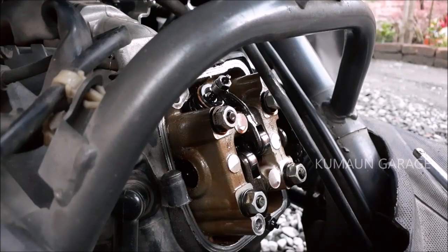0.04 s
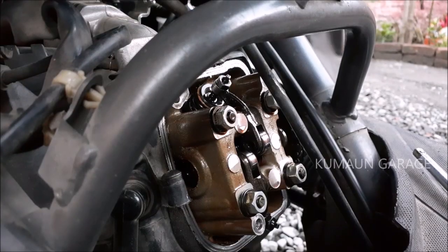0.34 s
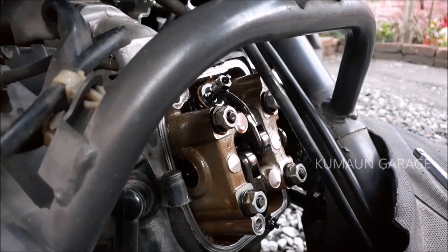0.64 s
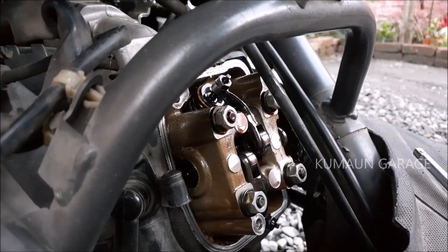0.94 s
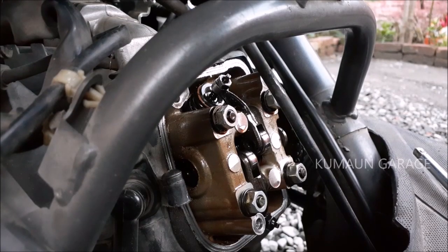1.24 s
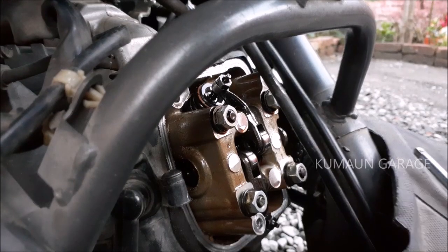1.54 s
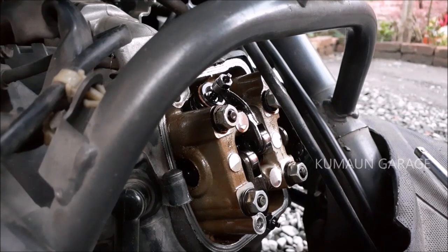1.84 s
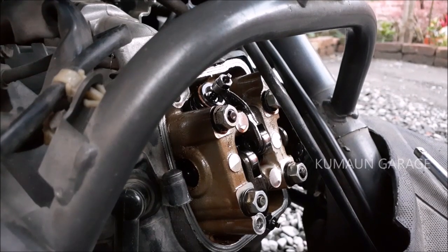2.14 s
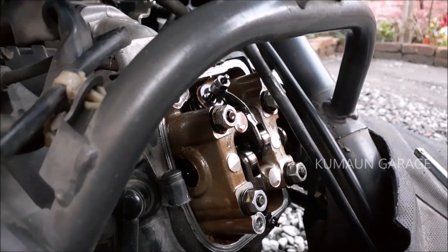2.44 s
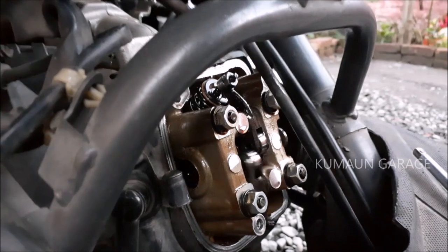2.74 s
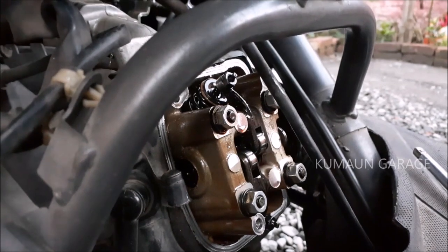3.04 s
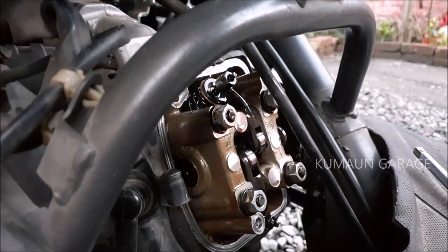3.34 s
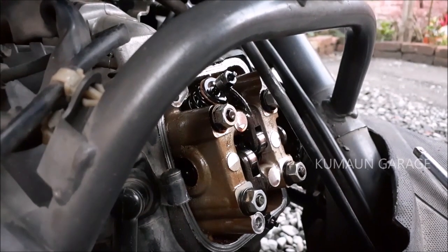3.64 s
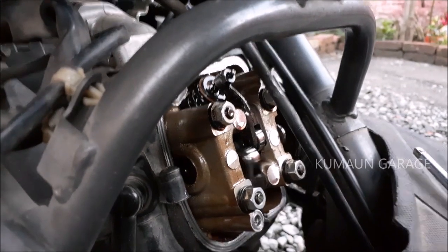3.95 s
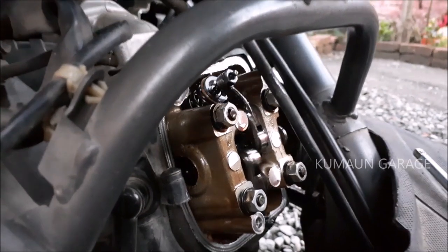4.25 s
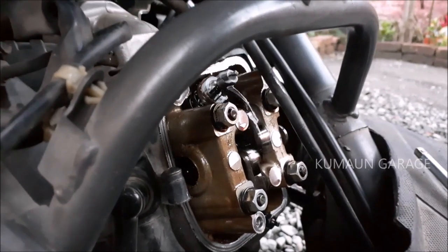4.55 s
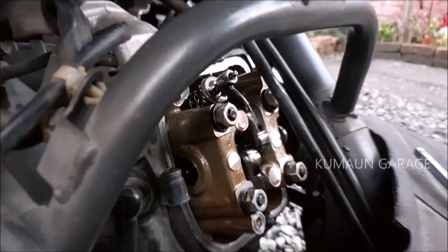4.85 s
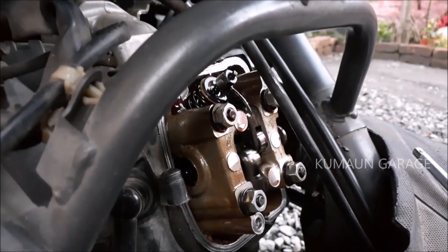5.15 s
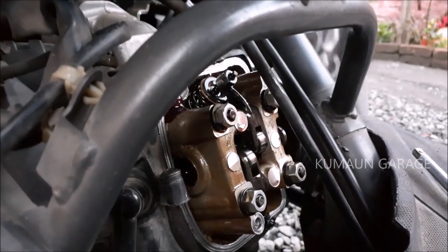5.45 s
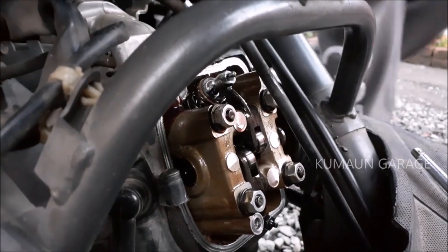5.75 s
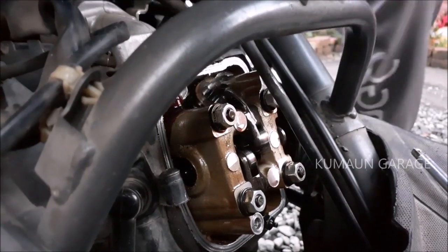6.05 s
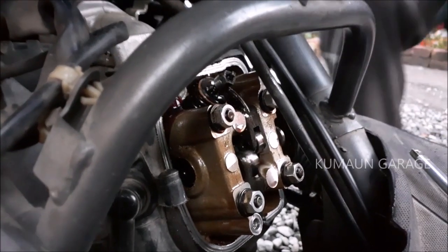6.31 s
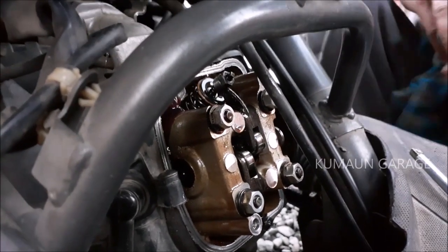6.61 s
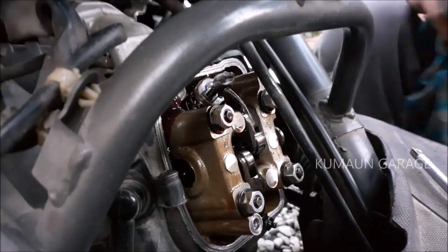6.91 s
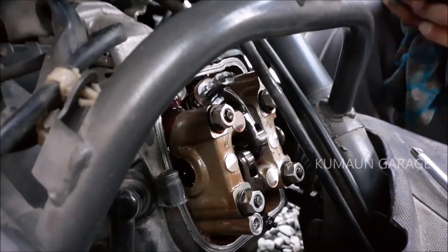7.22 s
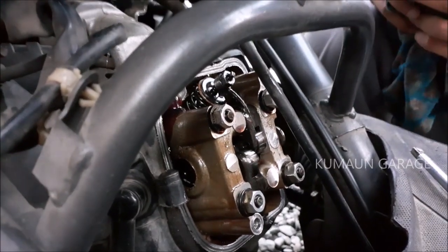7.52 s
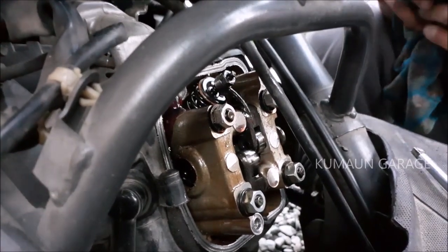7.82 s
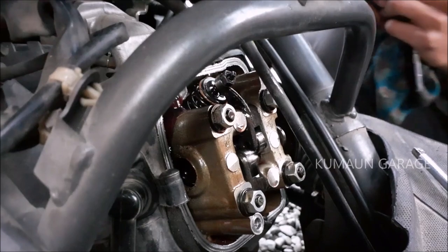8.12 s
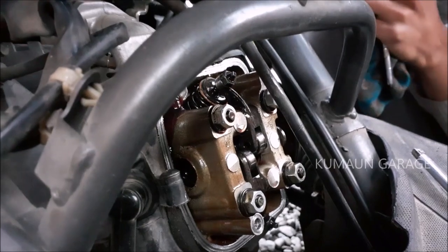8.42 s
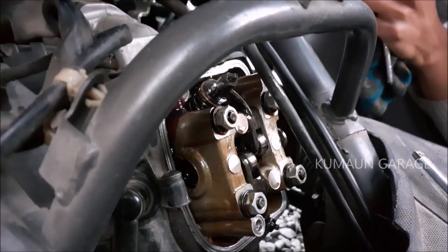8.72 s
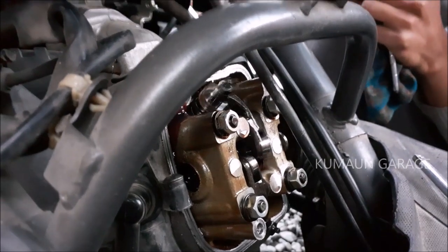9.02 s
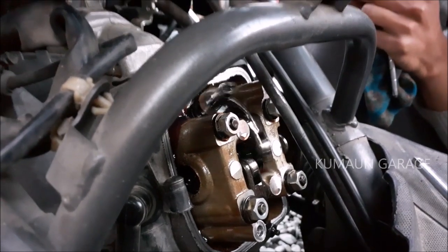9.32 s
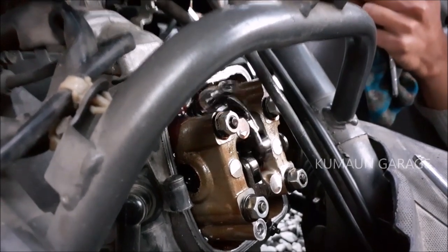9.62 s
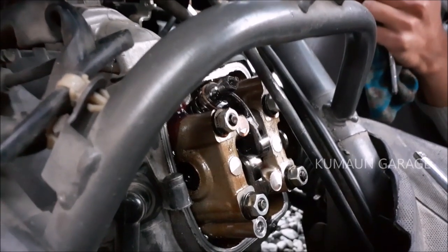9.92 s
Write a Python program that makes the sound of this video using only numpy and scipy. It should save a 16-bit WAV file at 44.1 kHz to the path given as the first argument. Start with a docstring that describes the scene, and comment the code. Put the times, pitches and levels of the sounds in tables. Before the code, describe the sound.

Plastic panels rub and tap faintly, then a scooter's steel kick lever clunks and gives a tiny high squeak. One kick spins the small engine with a rattle and sharp clanks, but it winds down. On the second kick it catches and settles into a steady idle, with rapid valve tapping, a rasping chain and a puttering exhaust. The microphone is close to the open engine, in a quiet spot outdoors.

```python
"""A small single-cylinder scooter engine, valve cover off, is kick-started close by, outdoors.
The steel lever knocks and squeaks; one kick spins the engine in vain, on the second it catches.
At idle the cam chain rasps on its sprocket, the rockers tap at fixed points of each cycle and
gas pulses make the exhaust putter. Before the kicks, plastic panels rub and a far bird chirps once."""
import sys
import numpy as np
from scipy import signal
from scipy.fft import rfft, irfft, next_fast_len
from scipy.io import wavfile
from scipy.ndimage import uniform_filter1d, map_coordinates

SR = 44100
rng = np.random.default_rng(int(sys.argv[2]) if len(sys.argv) > 2 else 0)


def materialize(psi):
    """Save the field psi as 16-bit PCM at rate SR to the path in sys.argv[1].

    A 1-D psi becomes a single channel; in a 2-D psi each row is a channel.
    """
    bounded = np.clip(np.atleast_2d(psi).T, -1, 1)
    quanta = np.round(bounded * 32767).astype(np.int16)
    wavfile.write(sys.argv[1], SR, quanta)


N = 439677

# engine speed once caught: (time [s], four-stroke cycle rate [Hz])
RUN_SPEED = [(4.1, 10.43), (4.39, 10.82), (5.02, 9.242), (5.88, 9.626), (6.15, 8.989), (6.4, 10.106),
             (6.73, 8.867), (6.84, 9.674), (6.97, 9.055), (8.14, 9.729), (8.4, 9.406), (8.7, 9.859),
             (8.87, 9.308), (9.48, 10.084), (9.8, 9.28), (9.97, 10.334)]
# cylinder head resonances: (frequency [Hz], width [Hz], level [dB])
HEAD_MODES = [(675, 74, 2), (773, 50, 0), (893, 55, 3), (1097, 60, 2.5), (1460, 38, 2), (1620, 43, -4),
              (1720, 39, -1), (1832, 59, 4), (2225, 59, 2)]
# hiss of the chain and of steel ticks: (frequency [Hz], density [dB])
STEEL_SPECTRUM = [(1500, -39.5), (3500, -6.5), (4800, -5.5), (5700, -8), (7200, -5.5), (7600, -11),
                  (8200, -2.5), (9000, -5), (10000, -2.5), (13500, -1.5), (14500, -3), (15000, -12.5),
                  (16000, 2)]
# hollow plastic panels: (frequency [Hz], density [dB])
PANEL_SPECTRUM = [(300, -12), (800, -15), (1100, -5), (1500, -3), (1900, -14), (2400, -16), (4000, -16.5),
                  (7000, -18.5), (10000, -20.5), (16000, -30)]
# stereo balance: (frequency [Hz], L-R [dB])
STEREO_BALANCE = [(150, -2), (250, -2), (350, -5.5), (480, 4), (700, 3), (1500, -0.5), (2800, -.5),
                  (6000, -0.5), (10000, -2), (15000, -1.5)]


def amp(db):
    """Decibels to gain."""
    return np.exp(np.asarray(db) * (np.log(10) / 20))


def clock():
    """Sample times [s]."""
    return np.arange(N) / SR


def along(points, hz):
    """Interpolate (frequency [Hz], value) points on a log axis."""
    f, v = np.transpose(points)
    return np.interp(np.log(hz + 1), np.log(f + 1), v)


def curves(rows):
    """One value per sample for each column after the time."""
    s, *cols = np.transpose(rows)
    return [np.interp(clock(), s, c) for c in cols]


def wobble(rate_hz):
    """Smooth random curve, rate_hz knots a second."""
    steps = np.arange(0, N * rate_hz / SR + 1, 1 / 8)
    knots = rng.standard_normal(int(steps[-1]) + 2)
    return np.interp(clock() * rate_hz, steps, map_coordinates(knots, [steps]))


def filtered(x, response):
    """Apply a gain given as a function of frequency."""
    size = next_fast_len(N + 8192)
    return irfft(rfft(x, size) * response(np.fft.rfftfreq(size, 1 / SR)), size)[..., :N]


def noise(spectrum):
    """Coloured stereo noise, tinged by the nearby head's resonances; mid rms 1."""
    # likeness of left and right: (frequency [Hz], correlation [1])
    likeness = [(30, .35), (70, .8), (150, 0.75), (330, 0.49), (700, 0.36), (1400, 0.1), (5000, 0.04),
                (14000, 0.0043)]
    size = next_fast_len(N, True)
    hz = np.fft.rfftfreq(size, 1 / SR)
    spread = np.arccos(np.clip(along(likeness, hz), -1, 1)) / 2
    peaks_db = sum(db / (1 + (2 * (hz - centre) / width) ** 2) for centre, width, db in HEAD_MODES)
    white = rng.standard_normal((2, 2 * len(hz))).view(complex)
    mid, side = white * amp(along(spectrum, hz) + peaks_db) * np.array([np.cos(spread), np.sin(spread)])
    lean = amp(along(STEREO_BALANCE, hz) / 2)
    pair = irfft(np.array([(mid + side) * lean, (mid - side) / lean]), size)[:, :N]
    return pair / np.std(pair.mean(axis=0))


def outdoor_air():
    """Faint, low outdoor noise."""
    # background loudness: (time [s], level [dB])
    levels = [(0, -57), (.2, -68.5), (1.5, -67.5), (3.8, -71), (9.97, -77.5)]
    # background colour: (frequency [Hz], density [dB])
    spectrum = [(25, -10), (65, -0.5), (140, -2.5), (250, -5), (420, -5.5), (600, -12.5), (1000, -17.5),
                (1550, -15.5), (2100, -19.5), (4000, -27), (8000, -35.5), (16000, -26.5)]
    return amp(curves(levels)[0]) * noise(spectrum)


def bird(waver_hz):
    """A far bird: one falling, unsteady tone."""
    # chirp: (time [s], pitch [Hz], level [dB])
    chirp = [(.46, 3200, -88), (.51, 3070, -75), (.56, 3030, -88)]
    hz, db = curves(chirp)
    sounding = (clock() > chirp[0][0]) & (clock() < chirp[-1][0])
    phase = 2 * np.pi * np.cumsum(hz + waver_hz * wobble(600)) / SR
    return sounding * amp(db) * np.sqrt(2) * np.sin(phase)


def yard(x, t60_s):
    """Short, slightly dull reverberation from ground and walls."""
    t = np.arange(SR // 4) / SR
    tail = rng.standard_normal((2, len(t))) * amp(-60 * t / t60_s) * (t > .008)
    wet = signal.oaconvolve(x, tail / np.linalg.norm(tail[0]), axes=1)[:, :N]
    return filtered(wet, lambda hz: amp(along([(300, 1.9), (3000, 0.26), (14000, -0.7)], hz)))


def bodywork(x, echo_db, count=10):
    """x plus the treble that nearby tubes and panels throw back within 25 ms."""
    echoes = np.zeros((2, SR // 40))
    for side in echoes:
        side[rng.integers(SR // 1000, len(side), count)] = rng.choice([-1, 1], count) / np.sqrt(count)
    near = signal.oaconvolve(x, echoes, axes=1)[:, :N]
    share = lambda hz: amp(echo_db + along([(400, -39), (2000, -4)], hz))
    return filtered(x + filtered(near, share), lambda hz: 1 / np.sqrt(1 + share(hz) ** 2))


def handling():
    """The scooter shifts on its stand: panels rub, then shiver on; the frame rumbles."""
    # rubs: (time [s], panel [dB], frame [dB])
    rubs = [(0.01, -69, -69), (.585, -57, -67), (.68, -68, -72), (.745, -81, -64), (.87, -64, -86),
            (.95, -72, -62), (1.114, -57, -69), (1.147, -55, -61.5), (1.33, -77, -62)]
    # frame rumble: (frequency [Hz], density [dB])
    frame_spectrum = [(25, -22), (80, -2), (150, -7), (300, 1), (700, -34.5)]
    rise_s, rub_t60_s, shiver_db, shiver_t60_s = 0.015, 0.23, -8, 0.95
    power = np.zeros((2, N))
    for s, *levels_db in rubs:
        t = clock()[:3 * SR] - s
        after = np.maximum(t, 0)
        decay = amp(-60 * after / rub_t60_s) + amp(shiver_db - 60 * after / shiver_t60_s)
        shape = np.exp(np.minimum(t, 0) / rise_s) * decay / (1 + amp(shiver_db))
        power[:, :len(t)] += np.outer(amp(levels_db), shape) ** 2
    panel, frame = np.sqrt(power)
    return panel * amp(2.8 * wobble(160)) * noise(PANEL_SPECTRUM) + frame * noise(frame_spectrum)


def panel_taps():
    """A panel snaps against its seat with a short, hollow tap."""
    # taps: (time [s], level [dB], t60 [s])
    taps = [(.576, -45, .035), (1.13, -44, .04)]
    envelope = np.zeros(N)
    t = np.arange(SR // 8) / SR
    for s, db, t60_s in taps:
        envelope[round(s * SR):][:len(t)] += amp(db - 60 * t / t60_s) * (1 - np.exp(-t / .0005))
    return envelope * noise(PANEL_SPECTRUM)


def pivot_squeaks(waver_hz):
    """Each slip of the lever's pivot swells and fades on one high, unsteady mode."""
    # slips: (time [s], length [s], pitch [Hz], level [dB])
    slips = [(2.213, 0.017, 14360, -24), (2.22, .045, 12800, -41), (2.25, .022, 13100, -32)]
    out = np.zeros(N)
    waver = waver_hz * wobble(600)
    for s, length_s, hz, db in slips:
        span = slice(round(s * SR), round((s + length_s) * SR))
        phase = 2 * np.pi * np.cumsum(hz + waver[span]) / SR
        out[span] += amp(db) * np.sqrt(2) * np.hanning(len(phase)) * np.sin(phase)
    return out


def blow_list():
    """Yield each clang and knock in the form clangs_and_knocks unpacks; harder is brighter."""
    # kick lever meets gear or stop: (time [s], clang [dB], hardness [dB], ring re clang [dB],
    # rise [s], t60 [s], thud [dB], thud pitch [Hz])
    clangs = [(1.61, -24.5, -3.5, -4, 0.0023, 0.12, -25.5, 248),
              (1.972, -35, -0.5, 6.5, 0.0011, 0.07, -48, 440),
              (2.281, -32, -4, 11, 0.0016, 0.085, -40.5, 312),
              (2.617, -33, 11.5, -8, 0.0016, 0.12, -31.5, 435), (2.707, -25.5, 7, -4, .0012, .06, -42, 350),
              (2.735, -27, 8, -2, .0012, 0.051, -46, 350), (2.768, -13, 8.5, -15, 0.0028, 0.07, -26.5, 413),
              (3.031, -44, 7.5, -6, .0012, 0.15, -42.5, 164), (3.39, -33, -3, -14, 0.0015, 0.15, -47, 191),
              (3.429, -21, 1, -7, 0.0014, 0.055, -41.5, 403),
              (4.149, -22, 12.5, -11, 0.0024, 0.14, -37, 300), (4.186, -16, 6, -4, 0.0018, 0.084, -43, 510),
              (4.1934, -14.5, -1, -5, 0.00035, 0.021, -44, 500), (4.213, -33, 2, 5, .001, 0.089, -44, 403)]
    # dull knocks in panels, crankcase and frame:
    # (time [s], clonk [dB], hardness [dB], thud [dB], thud pitch [Hz], L-R [dB])
    knocks = [(0.915, -56.5, -11, -48.5, 280, -1), (1.128, -50, -18, -49, 203, -3),
              (1.725, -47, -15, -46, 520, 2), (1.82, -64, -20, -47, 260, -2),
              (2.173, -71, -40, -42.5, 308, -5), (2.794, -27, -25, -34, 420, 3),
              (2.82, -27.5, -5, -45, 300, 0), (2.847, -35, -18, -30, 62, 0),
              (2.893, -30, -9, -30.5, 290, -4), (2.908, -41, -1, -39, 403, 1),
              (2.967, -34, -12, -54, 268, 0), (3.179, -37, -10, -27.5, 141, -5),
              (3.192, -24, -2, -31, 118, -1), (3.243, -39, -6, -49, 300, 0), (3.265, -38, -10, -45, 400, 0),
              (3.334, -32.5, -26, -40, 186, 2), (3.362, -46, -10, -40, 250, 0),
              (3.547, -42, -12, -45, 190, -2), (3.573, -40.5, -8, -42, 244, -1),
              (3.623, -55, -30, -46, 280, 0), (3.643, -51, -16, -52, 320, 2),
              (3.669, -49, -30, -55, 183, 0), (3.858, -48, -17.5, -49, 222, -1),
              (3.93, -46, -28, -47, 237, 1), (4.062, -33, -13, -26, 437, 0), (4.084, -38, -12, -33, 260, 2),
              (4.267, -31, -12, -39, 420, 0), (4.281, -36, -14, -31, 160, 0),
              (4.44, -22, -25, -27, 345, -1), (4.946, -23.5, -5, -30, 186, 3), (6.868, -26, 0, -39, 300, 0),
              (8.545, -26, -8, -43, 300, -2), (9.067, -25, -10, -43, 300, 4)]
    for s, clang_db, hard_db, ring_db, rise_s, t60_s, thud_db, hz in clangs:
        clonk_db, tick_db = clang_db - 9.5, clang_db + hard_db
        yield s, (thud_db, clonk_db, clang_db, tick_db, ring_db), hz, t60_s, rise_s, 0
    ring_db, t60_s, rise_s = 0, 0.05, .0012
    for s, clonk_db, hard_db, thud_db, hz, pan_db in knocks:
        clang_db, tick_db = clonk_db - 4.5 + hard_db / 2, clonk_db + hard_db
        yield s, (thud_db, clonk_db, clang_db, tick_db, ring_db), hz, t60_s, rise_s, pan_db


def clangs_and_knocks(tail_db, tail_t60_s, thud_stretch, boom_db):
    """Kick lever clangs and dull knocks: each a thud, clonk, clang and tick; loose parts shiver on."""
    # kick lever ring: (frequency [Hz], level [dB], t60 [s])
    lever_modes = [(1200, -15, .08), (1650, -14, .07), (2560, -12, .06), (2756, -3.5, .052),
                   (3311, -12, .06), (3590, -10, .06), (3890, -9, .06)]
    # frame tube ring, after heavy and hard blows: (frequency [Hz], level [dB], t60 [s])
    tube_modes = [(304, -13.5, .22), (665, -11.5, 0.28), (1240, -17.5, 0.32), (2190, -12, 0.22),
                  (2440, -11.5, 0.16), (2859, -20, .17)]
    # frame thud, case clonk, steel clang: (frequency [Hz], density [dB])
    thud_spectrum = [(25, -18.5), (60, -17), (110, 2), (180, -4), (270, 3.5), (440, -0.5), (580, -7),
                     (1500, -39.5)]
    clonk_spectrum = [(300, -17), (600, 0.5), (800, 2.5), (1100, -1.5), (1450, 2.5), (1800, -3.5),
                      (2200, -9), (5000, -43)]
    clang_spectrum = [(900, -15), (2000, 2.5), (2800, 5), (4000, 2), (5000, -0.5), (6500, -6.5),
                      (12000, -32)]
    envelopes, ring = np.zeros((4, 2, N)), np.zeros(N)
    for s, levels_db, thud_hz, t60_s, rise_s, pan_db in blow_list():
        thud_db, clonk_db, clang_db, tick_db, ring_db = levels_db
        span = slice(round(s * SR), round(s * SR) + SR // 2)
        t = np.arange(len(ring[span])) / SR
        attack = 1 - np.exp(-t / rise_s)
        sides = amp(np.array([[.5], [-.5]]) * pan_db)
        shiver = amp(tail_db - 60 * t / tail_t60_s)
        bands = [(thud_db - 2, thud_stretch), (clonk_db, 1.43), (clang_db, 1), (tick_db, 0.64)]
        for band, (db, stretch) in enumerate(bands):  # low bands last longer
            decay = amp(-60 * t / (t60_s * stretch))
            envelopes[band, :, span] += sides * attack * amp(db) * (decay + shiver)
        ring[span] += attack * amp(thud_db + boom_db - 60 * t / t60_s) * np.sin(2 * np.pi * thud_hz * t)
        for modes, drive_db in ((lever_modes, clang_db + ring_db), (tube_modes, min(thud_db, clang_db))):
            for hz, db, life_s in modes:
                mode_db = drive_db + db + 1.1 * rng.standard_normal()
                ring[span] += attack * amp(mode_db - 60 * t / life_s) * np.sin(2 * np.pi * hz * t)
    chatter = amp(1.3 * wobble(350))
    spectra = (thud_spectrum, clonk_spectrum, clang_spectrum, STEEL_SPECTRUM)
    return ring + chatter * sum(env * noise(spectrum) for env, spectrum in zip(envelopes, spectra))


def cycle_hz():
    """Engine speed: a crawl, a kick that spins up and coasts down, then the catch."""
    kick_s, push_s, spin_up_s, coast_tau_s = 2.5, .29, .15, .3
    crawl_hz, kick_hz = 0.97, 7.3
    t = clock()
    coast = np.exp(-np.maximum(t - kick_s - push_s, 0) / coast_tau_s)
    kick = np.clip((t - kick_s) / spin_up_s, 0, 1) * coast
    cranking_hz = crawl_hz + (kick_hz - crawl_hz) * kick
    caught = np.clip(1 + (t - RUN_SPEED[0][0]) / spin_up_s, 0, 1)
    return cranking_hz + caught * (curves(RUN_SPEED)[0] - cranking_hz)


def cam_angle(firing_s):
    """Cycles turned since the firing at firing_s."""
    turns = np.cumsum(cycle_hz()) / SR
    return turns - turns[round(firing_s * SR)]


def strikes(angle, scatter_db, jitter_s):
    """An impulse of random size each time the angle passes a whole number."""
    at = np.flatnonzero(np.diff(np.floor(angle)) > 0)
    size, late = rng.standard_normal((len(at), 2)).T
    at = np.clip(at + np.round(late * jitter_s * SR).astype(int), 0, N - 1)
    return np.bincount(at, amp(scatter_db * size), N)


def dying(impulses, t60_s):
    """Envelope of overlapping blows whose energies add and decay."""
    return np.sqrt(signal.lfilter([1], [1, -10 ** (-6 / (t60_s * SR))], impulses ** 2))


def ringing(blows, modes, rise_s, focus_hz=None, focus_db_per_oct=17, scatter_db=2.2):
    """Each blow rings the modes in a new mix, less far from focus_hz; each side has its own phases."""
    t = np.arange(SR // 12) / SR
    hz, width_hz, db = np.transpose(modes)
    if focus_hz:
        db = db - focus_db_per_oct * np.abs(np.log2(hz / focus_hz))
    phase = np.outer(hz, t) + rng.random((2, len(hz), 1))
    waves = np.exp(-np.pi * np.outer(width_hz, t)) * np.sin(2 * np.pi * phase) * (1 - np.exp(-t / rise_s))
    out = np.zeros((2, N + len(t)))
    for at in np.flatnonzero(blows):
        out[:, at:at + len(t)] += blows[at] * amp(db + scatter_db * rng.standard_normal(len(hz))) @ waves
    return out[:, :N]


def low_thumps():
    """Low thumps: under the first clunk, during the failed kick and its rebound, at the first firing."""
    # thumps: (time [s], level [dB], pitch [Hz], t60 [s])
    thumps = [(1.62, -32, 84, 0.22), (2.68, -23, 79.5, .08), (3.182, -20, 115, 0.16),
              (4.074, -21, 230, 0.067)]
    out = np.zeros(N)
    t = np.arange(SR // 4) / SR
    attack = 1 - np.exp(-t / 0.0048)
    for s, db, hz, t60_s in thumps:
        out[round(s * SR):][:len(t)] += attack * amp(db - 60 * t / t60_s) * np.sin(2 * np.pi * hz * t)
    return out


def exhaust(angle, t60_s):
    """Each gas pulse briefly swings the air in silencer or airbox and rings the crankcase."""
    # exhaust and intake pulses: (phase [cycles], level [dB], pitch [Hz], crankcase [dB])
    puffs = [(0.97, -14.5, 120.7, -33.5), (0.0896, -17, 115, -27), (.215, -23, 70, -30.5),
             (.335, -21.5, 105, -40), (.45, -28.5, 130, -34)]
    # hollow crankcase: (frequency [Hz], width [Hz], level [dB])
    case_modes = [(232, 40, -6.5), (296, 26, -2.5), (352.2, 19, 0), (400, 52, -9)]
    # combustion strength: (time [s], level [dB])
    combustion = [(4.0, -85), (4.07, -14), (4.6, -1.5), (5.5, -3.5), (6.1, -1), (9.97, 0)]
    t = np.arange(SR // 8) / SR
    attack = 1 - np.exp(-t / 0.0017)
    case, out = np.zeros((2, len(t))), np.zeros((2, N))
    for hz, width_hz, db in case_modes:
        sides = amp(db + np.array([[.5], [-.5]]) * along(STEREO_BALANCE, hz))
        case += sides * np.exp(-np.pi * width_hz * t) * np.sin(2 * np.pi * hz * t)
    for phase, db, hz, case_db in puffs:
        swing = np.sin(2 * np.pi * hz * t) * amp(db - 60 * t / t60_s)
        pulses = strikes(angle - phase, scatter_db=.8, jitter_s=.00018)
        out += signal.oaconvolve(pulses[None], attack * (swing + amp(case_db) * case), axes=1)[:, :N]
    return out * amp(curves(combustion)[0])


def rockers(angle):
    """Each contact clicks once a cycle and rings its part of the head, harder as the engine settles."""
    # rocker and valve contacts, piston slap:
    # (phase [cycles], knock [dB], knock focus [Hz], clack [dB], tick [dB])
    contacts = [(.111, -30, 1820, -37, -25), (.18, -36, 830, -33.5, -38), (.24, -32.5, 830, -49, -29),
                (.455, -52, 3900, -29, -30.5), (.6, -40, 753, -34, -52.5), (.67, -28.5, 1140, -46, -50),
                (.76, -30, 1036, -43, -39), (.845, -33, 690, -43.5, -42.5), (.862, -30.5, 1575, -31.5, -39)]
    # steel rocker arms: (frequency [Hz], width [Hz], level [dB])
    arm_modes = [(2704, 43, -7.5), (3166, 65, -0.5), (3580, 80, -2), (3890, 59, -2), (4020, 78, -6),
                 (4280, 90, -0.5), (4670, 66, -1)]
    # a clack's dry crack: (frequency [Hz], density [dB])
    crack_spectrum = [(1000, -35.5), (2300, 0), (3800, 0), (6500, -3.5), (12000, -27)]
    force = amp(np.interp(clock(), [4.0, 4.2, 4.45, 6.0, 9.5], [-69, -2, -6.5, -0.5, 1.5]))
    energy, rings = np.zeros((2, N)), np.zeros((2, N))
    for phase, knock_db, focus_hz, clack_db, tick_db in contacts:
        blows = strikes(angle - phase, scatter_db=2.1, jitter_s=.0004)
        energy += np.outer(amp([clack_db - 3.5, tick_db]), dying(blows, t60_s=0.075)) ** 2
        rings += amp(knock_db) * ringing(blows, HEAD_MODES, rise_s=0.0013, focus_hz=focus_hz)
        rings += amp(clack_db - 1) * ringing(blows, arm_modes, rise_s=0.0011)
    crack, tick = np.sqrt(energy)
    return force * (rings + crack * noise(crack_spectrum) + tick * noise(STEEL_SPECTRUM))


def drive_gains():
    """Rumble, casing, chain gains: each swell rises, holds, falls; once caught they follow the speed."""
    # swells of scraping and rattle from the kick starter, the last as the engine catches:
    # (peak time [s], hold [s], fall [dB/s], rumble [dB], casing [dB], chain [dB])
    swells = [(1.813, .18, 205, -49.5, -72, -91.5), (1.927, 0.012, 297, -55, -46.5, -54.5),
              (2.252, 0.012, 192, -48, -51.5, -53), (2.63, 0.082, 58, -31, -30.5, -32.5),
              (3.223, 0.016, 81, -36.5, -43.5, -44), (3.423, 0.13, 265, -50.5, -53.5, -56.5),
              (3.976, 0.13, 98, -45.5, -49.5, -60), (4.126, 0.048, 250, -48, -31, -43)]
    idle_db, idle_hz, race_db_per_hz = np.array([[-31.5], [-31.5], [-32]]), 9.26, 0.5
    catch_s, swell_db_per_s, brighten_db_per_s = 4.08, 307, 0.64
    steepness = np.array([[1], [1], [1.05]])  # the chain rises and falls faster
    t = clock()
    race_db = race_db_per_hz * (curves(RUN_SPEED)[0] - idle_hz)
    running_db = idle_db + race_db + steepness * swell_db_per_s * np.clip(t - catch_s, -1, 0)
    running_db[2] += brighten_db_per_s * (t - catch_s)
    power = amp(running_db) ** 2
    for s, hold_s, fall_db_per_s, *levels_db in swells:
        span = slice(round((s - .5) * SR), round((s + 1) * SR))
        age_s = t[span] - s
        shape_db = np.minimum(swell_db_per_s * age_s, -fall_db_per_s * np.maximum(age_s - hold_s, 0))
        power[:, span] += amp(steepness * shape_db + np.array(levels_db)[:, None]) ** 2
    return np.sqrt(power)


def cam_drive(angle, teeth):
    """Chain links slap onto the sprocket, harder under valve load, and shake head and crankcase."""
    # valve spring load, two humps: (phase after firing [cycles], rumble [dB], casing [dB], chain [dB])
    valve_load = [(0, 5, 3, 4.5), (.12, 4.5, 0.5, 4.5), (.28, 0, 0, 6), (.42, 0, -2.5, 1),
                  (.58, 0, -1.5, 3), (.68, -1.5, -0.5, 0.5), (.8, 2.5, 3, 4.5), (.88, 2.5, 2.5, 6.5)]
    # casing clatter, low rumble: (frequency [Hz], density [dB])
    casing_spectrum = [(300, -40.5), (480, 0), (560, -3), (700, 4.5), (1100, -2), (1350, 1), (1850, -1),
                       (2000, -5), (2200, -0.5), (2550, -2), (3800, -4), (5500, -24.5), (8000, -17.5),
                       (12000, -46)]
    rumble_spectrum = [(20, -20), (45, -7.5), (70, -0.5), (160, 0), (210, -1), (300, 0.5), (365, 0.5),
                       (440, -6), (560, -17), (900, -41)]
    phase, *loads_db = np.transpose(valve_load)
    pace = np.clip(cycle_hz() / 9, 0, 1) ** 2
    rumble, casing, chain = [gain * amp(pace * np.interp(angle, phase, load_db, period=1))
                             for gain, load_db in zip(drive_gains(), loads_db)]
    links = dying(strikes(angle * teeth, scatter_db=1.6, jitter_s=.0004), t60_s=.024)
    links /= np.sqrt(np.abs(uniform_filter1d(links ** 2, SR // 10)) + 1e-3)
    # turned slowly the parts scrape; at speed the links strike one by one
    grain = pace * links * amp(.5 * wobble(22)) + (1 - pace) * amp(3 * wobble(110) - 1)
    rasp = amp(0.5) * chain * grain * noise(STEEL_SPECTRUM)
    clatter = amp(-1.5 - 1.28 * pace) * casing * grain * amp(1.3 * wobble(140)) * noise(casing_spectrum)
    # tooth-rate growl, loudest as the engine races just after catching
    growl = pace * np.sin(2 * np.pi * teeth * angle + 0.98 * wobble(24)) * amp([[-14], [-7]])
    growl *= amp(np.interp(clock(), [4.0, 4.1, 4.25, 4.5, 4.8], [-4, -6, 9, 5, -1.5]))
    growl *= amp(2 * wobble(70) - 2.5)
    looseness = amp(np.interp(clock(), [4.3, 4.8], [-3, -5.5]))  # drops once firing is even
    return rasp + clatter + rumble * (looseness * noise(rumble_spectrum) + growl)


def scene():
    """Engine, starter and the quiet yard around them."""
    angle = cam_angle(firing_s=4.56)
    engine = cam_drive(angle, teeth=38) + rockers(angle) + exhaust(angle, t60_s=0.043) + low_thumps()
    blows = clangs_and_knocks(tail_db=-27.5, tail_t60_s=0.35, thud_stretch=2.96, boom_db=6.5)
    squeak = pivot_squeaks(waver_hz=160) * amp([[-9], [4]])
    scooter = bodywork(engine + blows, echo_db=-9) + squeak + handling() + panel_taps()
    outdoors = outdoor_air() + bird(waver_hz=25)
    return scooter + amp(-13.5) * yard(scooter, t60_s=0.21) + outdoors


def record(dry):
    """The microphone loses the deepest bass; nothing passes above top_hz."""
    low_hz, top_hz, taper_hz = 15, 15950, 300
    thinned = signal.sosfilt(signal.butter(1, low_hz, "highpass", fs=SR, output="sos"), dry)
    return filtered(thinned, lambda hz: np.sin(np.pi / 2 * np.clip((top_hz - hz) / taper_hz, 0, 1)) ** 2)


dry = scene()
out = record(dry)
materialize(out)
```